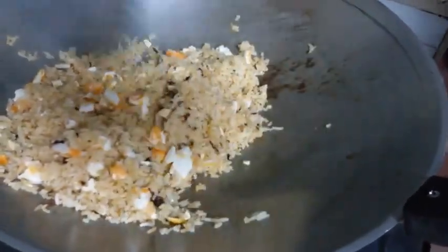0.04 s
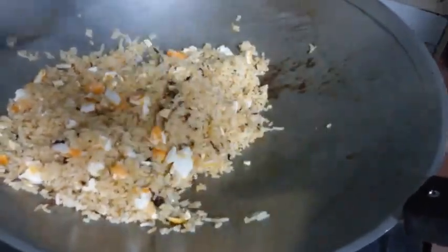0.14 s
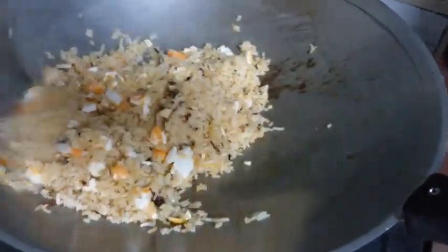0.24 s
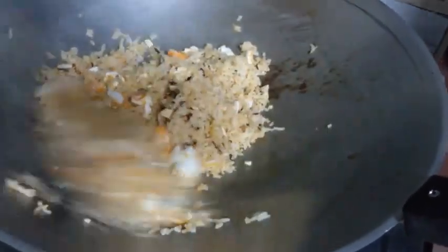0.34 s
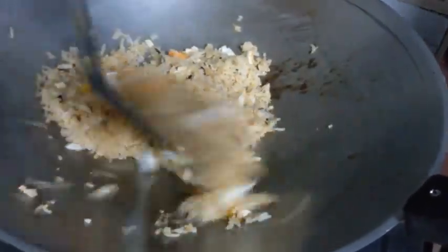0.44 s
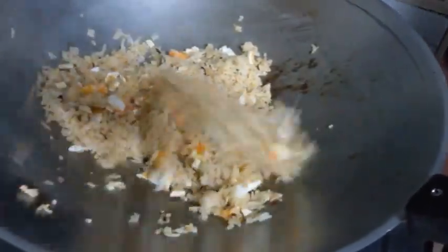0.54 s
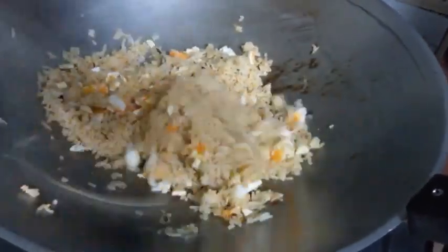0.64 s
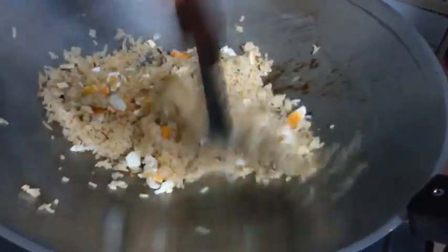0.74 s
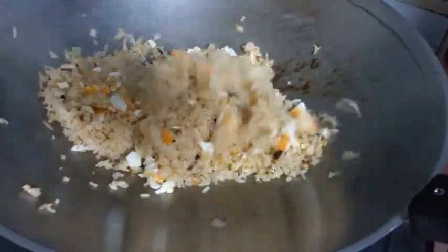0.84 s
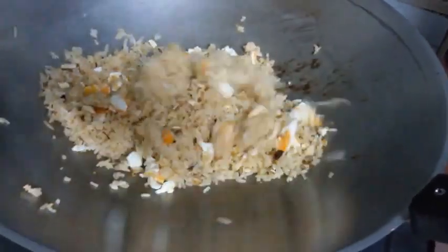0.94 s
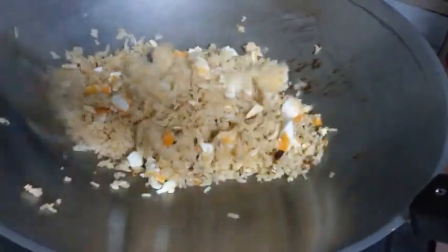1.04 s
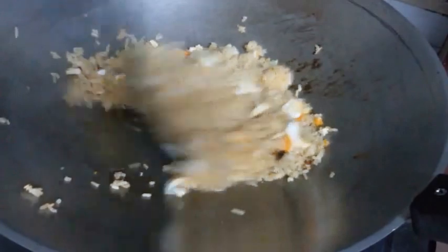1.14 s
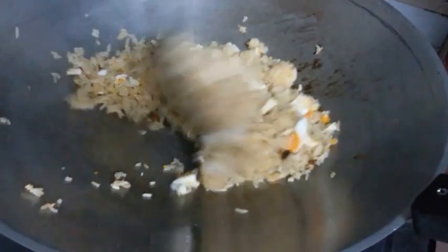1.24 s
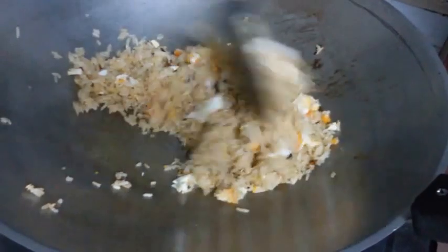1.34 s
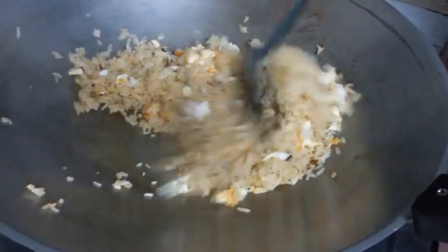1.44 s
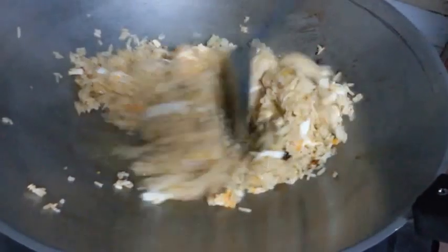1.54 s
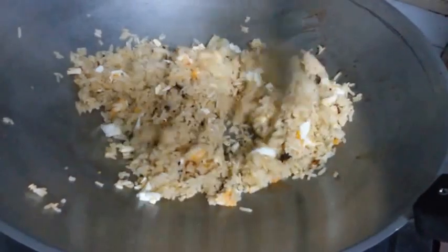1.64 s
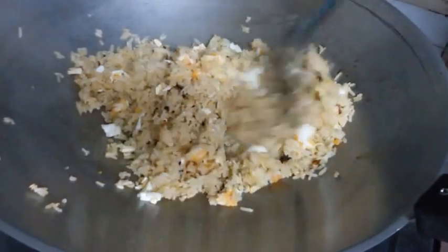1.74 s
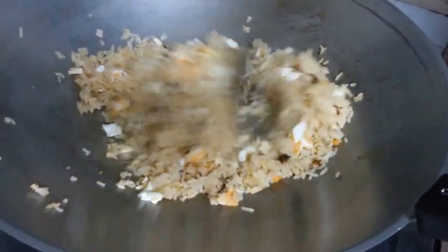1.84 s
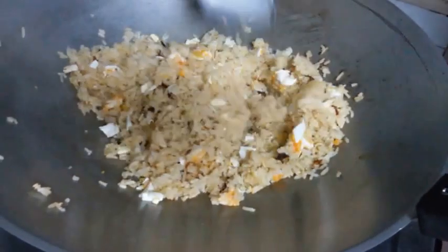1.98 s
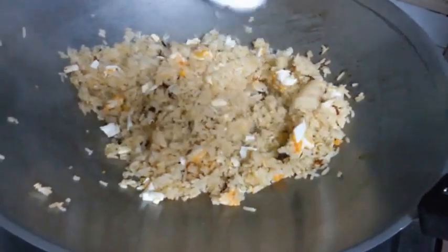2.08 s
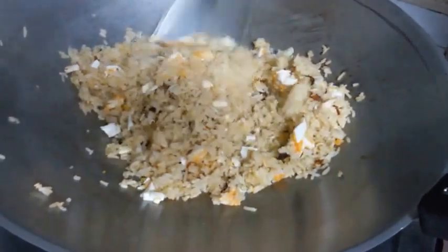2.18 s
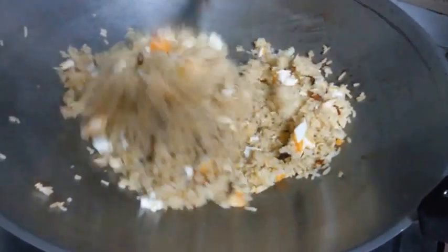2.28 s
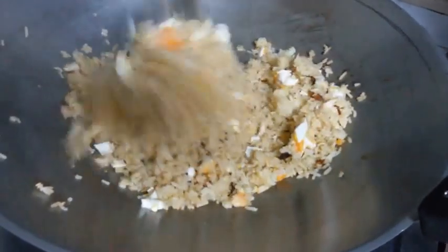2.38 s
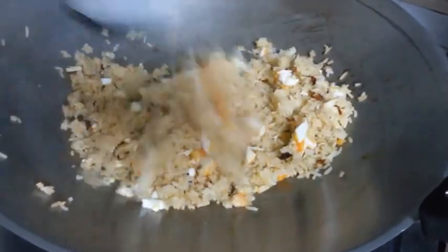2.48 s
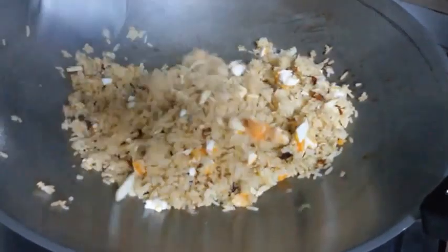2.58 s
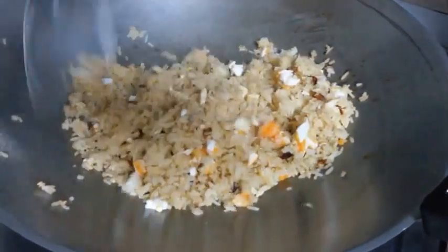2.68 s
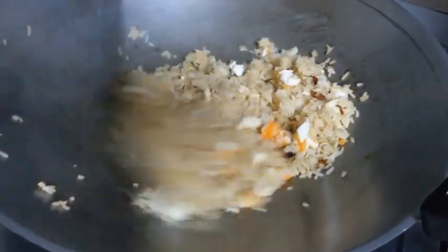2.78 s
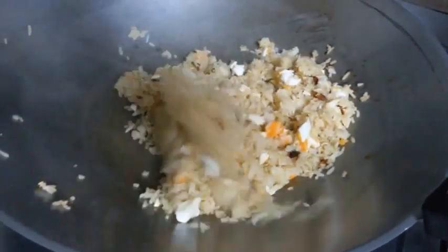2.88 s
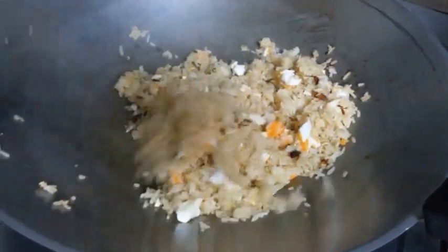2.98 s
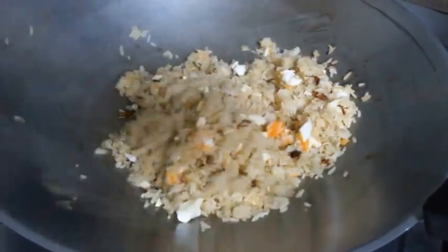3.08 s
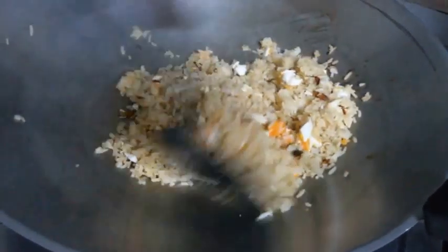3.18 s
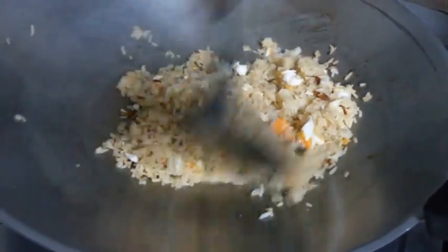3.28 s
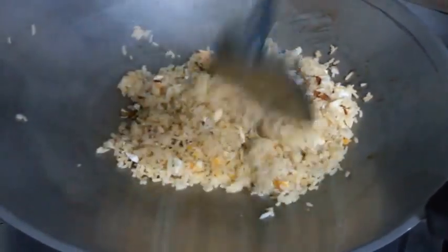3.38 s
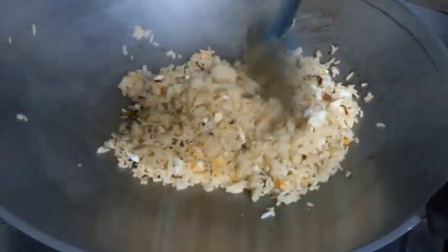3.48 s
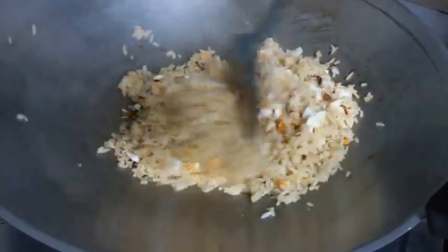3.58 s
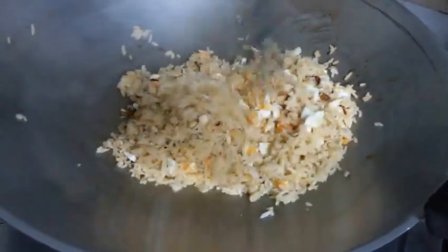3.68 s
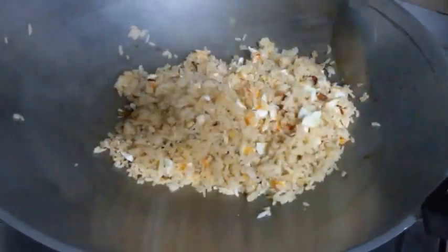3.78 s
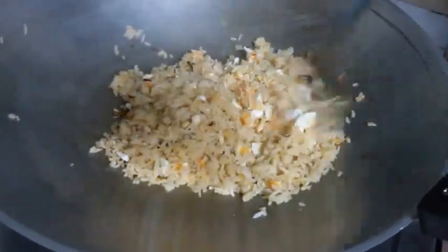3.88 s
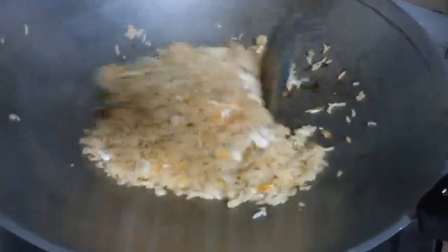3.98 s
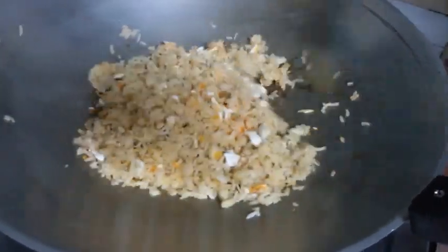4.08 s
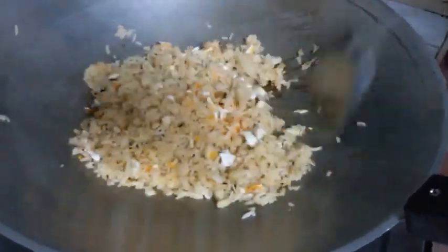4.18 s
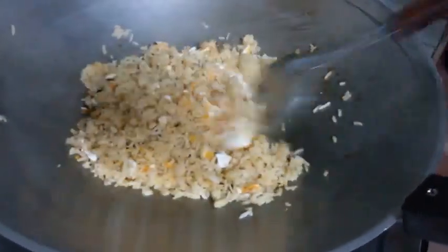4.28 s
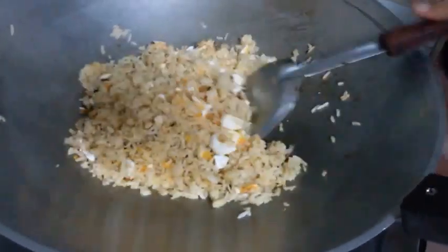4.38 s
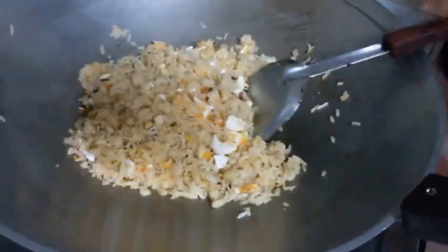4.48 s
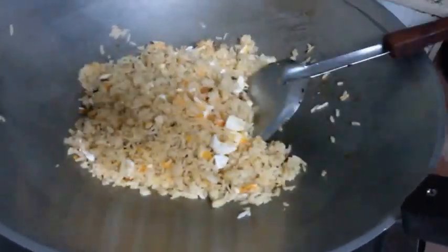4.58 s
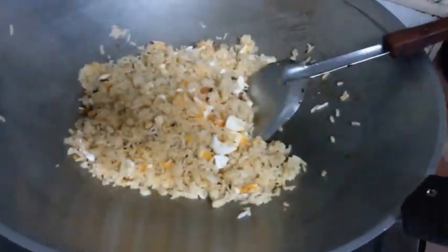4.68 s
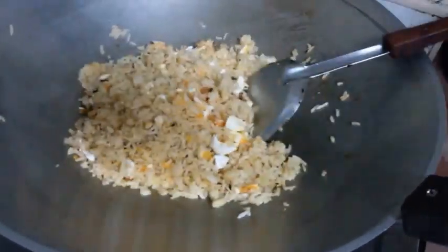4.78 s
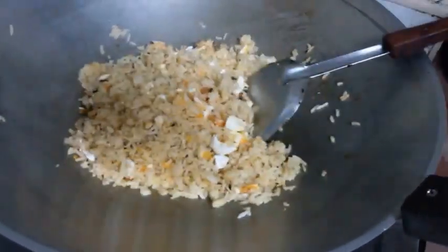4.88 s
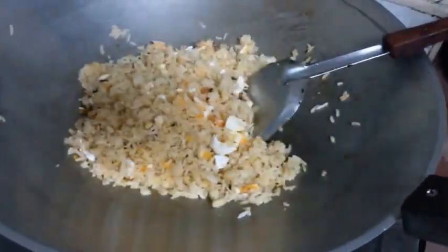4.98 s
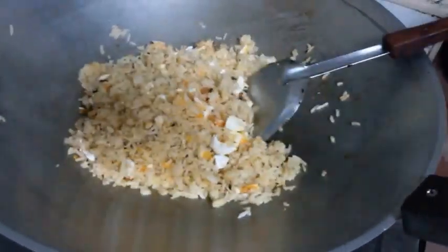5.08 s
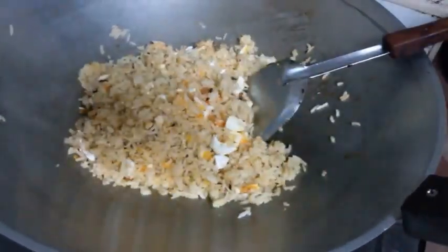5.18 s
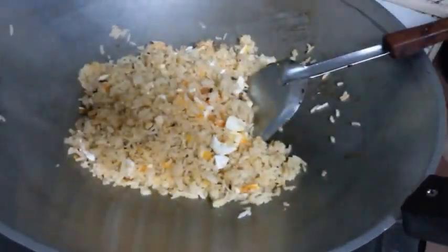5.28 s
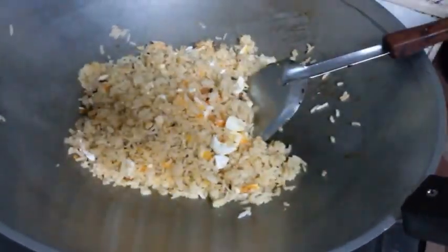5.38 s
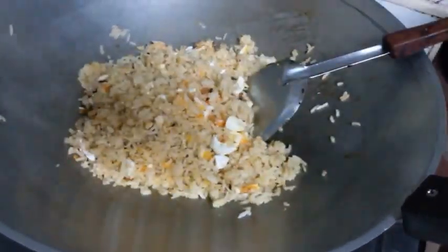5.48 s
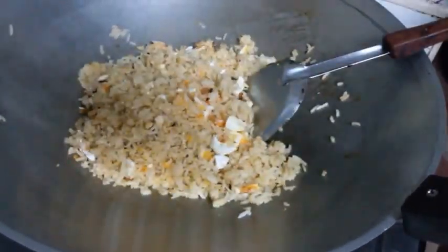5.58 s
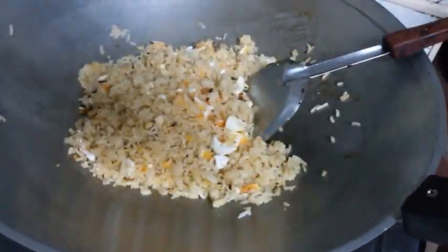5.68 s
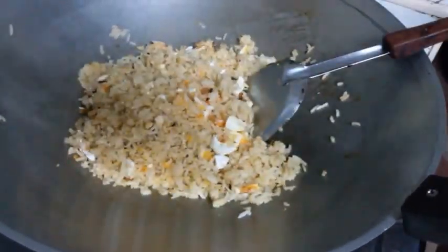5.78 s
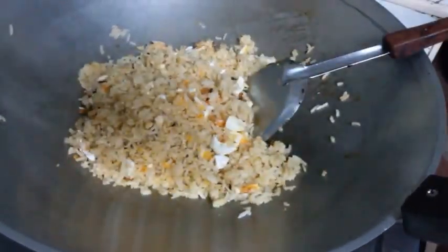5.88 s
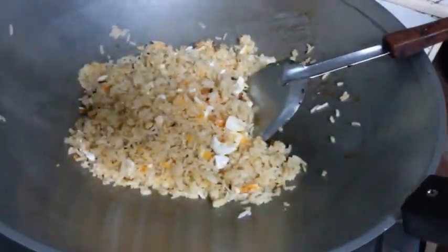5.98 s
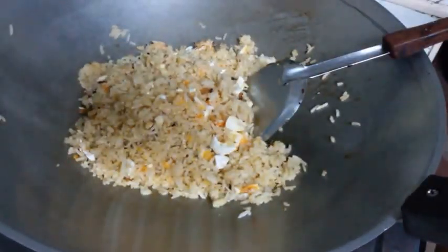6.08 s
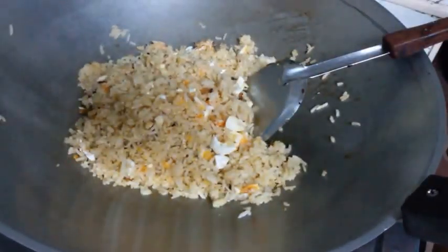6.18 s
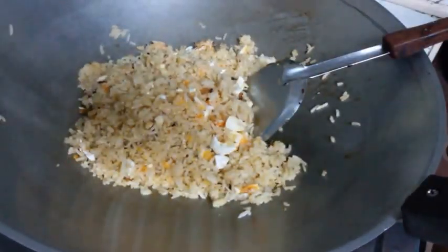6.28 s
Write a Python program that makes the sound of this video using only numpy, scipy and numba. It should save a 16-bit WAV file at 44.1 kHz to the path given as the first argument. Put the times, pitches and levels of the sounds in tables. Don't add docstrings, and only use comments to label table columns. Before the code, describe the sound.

Sharp, short steel clanks and gritty scrapes of stir-frying rice over faint hiss; after the last knock, frying sizzle rises and crackles on.

```python
import sys
import numpy as np
from scipy import signal
from scipy.fft import rfft, irfft
from scipy.io import wavfile
from scipy.ndimage import uniform_filter1d
from numba import njit

SR = 44100
rng = np.random.default_rng(int(sys.argv[2]) if len(sys.argv) > 2 else 0)


def output_pcm(signal):
    pcm = np.clip(np.atleast_2d(signal).T, -1, 1) * 32767
    wavfile.write(sys.argv[1], SR, np.round(pcm).astype(np.int16))


def makeup_ratio(level_db):
    decades = np.asarray(level_db, float) / 20
    return 10 ** decades


N = 279153

# [t/s, peak level/dB, thud 150-600 Hz level/dB, body 0.7-2.4 kHz level/dB, body note f/Hz]
BLOWS = [(0.2385, 0, -39, -18, 1280), (0.6637, 2, -31, -20, 1470), (1.064, 4, -26, -17, 1480),
         (1.5516, 5, -23, -7.5, 2080), (1.8632, 4.5, -18, -10.5, 1900), (2.1616, -1, -25, -19.5, 1380),
         (2.2164, -1, -41, -26, 1330), (2.6646, 3, -46, -13, 858), (3.1271, -2.5, -29, -14, 870),
         (3.9394, 0, -21, -17.5, 1330), (4.2697, 0.5, -21, -19.5, 1980), (4.2914, -9, -30, -22, 1990),
         (4.5615, -2, -18, -3.5, 922)]
SPLIT_HZ = 2500


def level(x, db):
    return x * makeup_ratio(db) / np.sqrt(np.mean(x ** 2))


def on_log(table, hz):
    points = np.array(table, float)
    return np.interp(np.log(hz), np.log(points[:, 0]), points[:, 1])


def band(x, lo_hz, hi_hz):
    sos = signal.butter(2, [lo_hz, min(hi_hz, .45 * SR)], "band", fs=SR, output="sos")
    return signal.sosfilt(sos, x)


def colour(x, table):
    hz = np.maximum(np.arange(N // 2 + 1) * SR / N, 1.)
    return level(irfft(rfft(x) * makeup_ratio(on_log(table, hz)), N), 0)


def walk(rate, count=1):
    hold = int(SR / rate)
    held = np.repeat(rng.standard_normal((count, N // hold + 1)), hold, axis=1)
    return 0.77 * uniform_filter1d(held, hold, axis=1)[:, :N]


def fan(flicker_db):
    # [f/Hz, level/dB per Hz]
    air_colour = [(15, -52), (25, -20), (65, -8), (95, -16), (126, -4.5), (184, -5.5), (243, -4.5),
                  (275, -3.5), (387, -11.5), (849, -13.5), (1070, -13.5), (1710, -15.5), (4000, -20.5),
                  (5200, -24), (8800, -120)]
    air = rfft(colour(rng.standard_normal(N), air_colour))
    octave = np.log2(np.maximum(np.arange(len(air)) * SR / N, 1.) / 20)
    flickering = np.zeros(N)
    for k, flicker in enumerate(walk(8, count=10)):
        share = np.clip(1 - np.abs(octave - k), 0, 1)
        flickering += irfft(air * share, N) * makeup_ratio(flicker_db * flicker)
    hum_hz, hum_width_hz, hum_db = 100.9, 9.5, -8.5
    hum = band(rng.standard_normal(N), hum_hz - hum_width_hz / 2, hum_hz + hum_width_hz / 2)
    return level(flickering, 0) + level(hum, hum_db)


def sizzle(top_db, grain_db, grains_per_s, crackle_db):
    # [f/Hz, level/dB per Hz]
    fry_colour = [(880, -32), (1500, -9.5), (3370, -3.5), (3670, -1.5), (4050, 0), (5720, 5.5), (9180, -5),
                  (14000, -14), (15000, -18.5)]
    size = np.minimum(rng.exponential(size=N), 4)
    grains = (rng.random(N) < grains_per_s / SR) * makeup_ratio(grain_db * size)
    puffs = signal.lfilter([1], [1, -.95], grains) * rng.standard_normal(N)
    hiss = rng.standard_normal(N) * makeup_ratio(3.1 * walk(14)[0])
    fizz = colour(level(hiss, 0) + level(puffs, crackle_db), fry_colour)
    return fizz + (makeup_ratio(top_db) - 1) * band(fizz, 10600, 22300)


def frying():
    # [t/s, level/dB]
    heat = [(0.0, -36.5), (0.2, -42), (0.45, -37), (1.0, -37), (1.3, -34), (1.55, -36.5), (2.1, -37.5),
            (2.5, -40), (3.0, -39), (3.45, -39), (3.85, -38), (4.2, -41), (4.7, -42.5), (5.3, -42),
            (5.8, -43.5), (6.33, -42)]
    return makeup_ratio(np.interp(np.arange(N) / SR, *np.transpose(heat)))


def spits(cycles, top_s):
    # [t/s, peak level/dB, centre f/Hz]
    droplets = [(0.031, -15.5, 5460), (0.089, -16, 6000), (0.104, -15, 5940), (0.1623, -6.5, 5970),
                (0.2024, -25, 3040), (0.2174, -22, 4500), (0.4773, -14.5, 4980), (0.5078, -11, 4970),
                (0.5172, -12, 5900), (0.596, -19.5, 5700), (0.8922, -15.5, 4650), (0.9248, -17.5, 5850),
                (1.3028, -18, 6440), (1.3554, -19, 4660), (1.4484, -17, 5700), (2.1041, -15, 5840),
                (2.4628, -29, 4930), (3.4028, -16, 5900), (5.257, -19, 5840), (5.426, -15, 4250),
                (5.6284, -18.5, 5940), (5.7567, -31, 5680), (5.7851, -18, 5200), (5.8135, -28, 5900),
                (5.8227, -21, 5900), (5.9987, -23, 3660), (6.1226, -20, 4900), (6.2551, -21.5, 4570),
                (6.264, -27, 4970), (6.2946, -19, 5270)]
    out, t = np.zeros(N + 400), np.arange(400) / SR
    noises = rng.standard_normal((len(droplets), 2, 400))
    for (s, peak_db, hz), noise in zip(droplets, noises):
        pop = band(noise[0] * np.exp(-t * hz / cycles), 0.5 * hz, 1.47 * hz)
        top_db = -14 - 6 * noise[1, -1]
        crack = band(noise[1] * np.exp(-t / top_s), 5400, 11700)
        burst = pop / np.abs(pop).max() + makeup_ratio(top_db) * crack / np.abs(crack).max()
        start = int(s * SR)
        out[start:start + 400] += makeup_ratio(peak_db) * burst
    return out[:N]


def pan_modes(count, strong_db):
    # [f/Hz, level/dB]
    strongest = [(258.4, -45), (872.1, -43), (979.8, -44), (2191, -47), (2772, -42), (3208, -41),
                 (3661, -43), (3747, -42), (4339, -42), (4495, -38), (4657, -41), (5292, -42), (5572, -43),
                 (5809, -40), (6352, -40), (6503, -41)]
    # [f/Hz, level/dB]
    thicket = [(1410, -42), (2400, -9), (2760, -6), (3060, -10.5), (4110, -0.5), (4490, 0), (5530, -1),
               (6080, 2.5), (7700, -13), (14000, -42.5)]
    # [f/Hz, T60/s]
    decay = [(200, .2), (900, .18), (1300, .14), (2900, .12), (4000, .07), (13000, .04)]
    strong_hz = np.transpose(strongest)[0]
    dense_hz = np.concatenate((np.geomspace(215, 2380, count // 3), np.linspace(2550, 14000, count)))
    dense_hz = dense_hz * (1 + 0.0076 * rng.standard_normal(len(dense_hz)))
    hz = np.concatenate((strong_hz, dense_hz))
    lift_db = np.concatenate((np.full(len(strong_hz), strong_db), np.zeros(len(dense_hz))))
    db = lift_db + on_log(thicket, np.maximum(hz, 2700))
    t60 = on_log(decay, hz) * np.exp(.2 * rng.standard_normal(len(hz)))
    return hz, db, t60


@njit
def ring(force, hz, t60, coupling):
    out = np.zeros(len(force))
    for m in range(len(hz)):
        p = np.exp(2j * np.pi * hz[m] / SR - np.log(1000) / (t60[m] * SR))
        z = 1e-18 + 0j
        for i in range(len(force)):
            z = z * p + force[i] * coupling[m, i >> 6] + 1e-18
            out[i] += z.imag
    return out


def radiate(force, hz, t60, mix):
    low = hz < SPLIT_HZ
    bright = ring(force, hz[~low], t60[~low], mix[~low])
    bright = signal.sosfilt(signal.butter(8, SPLIT_HZ, "high", fs=SR, output="sos"), bright)
    sign = np.where(hz[low] < 1100, (-1.) ** np.arange(low.sum()), 1)
    body = band(ring(force, hz[low], t60[low], mix[low] * sign[:, None]), 223, 6800)
    return bright + body, np.abs(bright)


def blows(modes, chatter_s, note_db):
    hz, db, t60 = modes
    out, length = np.zeros(N + SR), SR // 3
    t = np.arange(length) / SR
    edge_db = -17.5
    for s, peak_db, thud_db, body_db, note_hz in BLOWS:
        tilt = [(300, thud_db + 23.5), (450, thud_db + 13), (720, thud_db + 9.5),
                (800, body_db + 6), (1400, body_db + 11.5), (2300, body_db + 10),
                (2520, 0.04), (6800, 0.045), (8000, edge_db + 12.5)]
        note = np.exp(-(np.log(hz / note_hz) / .05) ** 2) * min(1100 / note_hz, 1) ** 1.5
        spot_db = 1.5 * rng.standard_normal(len(hz)) * (1 - note)
        mix = makeup_ratio(db + on_log(tilt, hz) + note_db * note + spot_db)
        mix = np.repeat(mix[:, None], length // 64 + 1, axis=1)
        roam = np.repeat(rng.standard_normal((len(hz), 30)), 8, axis=1)[:, :mix.shape[1]]
        roam_db = 3 * roam + 7 * uniform_filter1d(roam, 7, axis=0)
        mix = mix * makeup_ratio(roam_db * (1 - note)[:, None])
        shake = np.exp(-t / chatter_s) + makeup_ratio(-13.5) * np.exp(-t / 0.043)
        force = rng.standard_normal(length) * shake * np.clip(t / 0.0017, 0, 1)
        clang, size = radiate(force, hz, t60 * (0.54 + 0.64 * note), mix)
        start = int(s * SR)
        out[start:start + length] += clang * makeup_ratio(peak_db) / size.max()
    return out[:N]


def strokes(modes, slip_db, focus_db, judder_db):
    # [lift t/s, pressure at the lift level/dB, fade/dB per s, body 0.7-2.4 kHz level/dB, brightest ringing f/Hz]
    scrapes = [
        (0.413, -21, 450, -19.5, 5250),
        (0.786, -20.5, 902, -20.5, 4370),
        (1.202, -16, 903, -15, 4700),
        (2.278, -15.5, 257, -16.5, 4820),
        (2.766, -15.5, 210, -18.5, 5250),
        (3.26, -16, 412, -21, 6350),
        (3.989, -17, 445, -13, 5500),
        (4.348, -17, 242, -12.5, 5750),
    ]
    swell_db_per_s, touch_s, fade_out_db = 56, 0.022, 40
    lift_body_db, lift_s, dulling_per_s = 6.5, .04, 1.2
    hz, db, t60 = modes
    out = np.zeros(N + SR)
    for lift_at_s, press_db, fade_db_s, rasp_body_db, bright_hz in scrapes:
        touch_at_s = max(blow[0] for blow in BLOWS if blow[0] < lift_at_s)
        t = touch_at_s + np.arange(SR // 2) / SR
        t = t[t < lift_at_s + fade_out_db / fade_db_s + .12]
        count = len(t)
        lifted = t - lift_at_s
        swell_db = np.minimum(swell_db_per_s * lifted, -fade_db_s * lifted)
        press = np.clip((t - t[0]) / touch_s, 0, 1) * makeup_ratio(press_db + swell_db)
        press = press * makeup_ratio(judder_db * walk(53.7)[0, :count])
        uneven_db = slip_db * rng.exponential(size=count) + 1.5 * walk(160)[0, :count]
        slips = rng.standard_normal(count) * makeup_ratio(uneven_db)
        steps = lifted[::64]
        spots = np.repeat(rng.standard_normal((len(hz), 24)), 16, axis=1)
        spots = uniform_filter1d(spots, 12, axis=1)[:, :len(steps)]
        wander_db = 5.5 * spots + 18 * uniform_filter1d(spots, 9, axis=0)
        detune = np.log(hz[:, None] / bright_hz) + dulling_per_s * np.maximum(steps, 0)
        focus = np.exp(-(detune / 0.097) ** 2)
        body_db = rasp_body_db + lift_body_db * min(fade_db_s / 900, 1) * np.clip(1 + steps / lift_s, 0, 1)
        body_tilt_db = on_log([(300, 8), (420, 2.5), (720, -1), (830, 0.5), (2000, 13.5)], hz)[:, None]
        low_db = (hz[:, None] < SPLIT_HZ) * (body_db + body_tilt_db)
        grit_db = on_log([(6500, 0.5), (8000, 6.5), (12000, 10)], hz)[:, None]
        mix = makeup_ratio(db[:, None] + wander_db + focus_db * focus + low_db + grit_db)
        mix = mix / np.sqrt(np.sum(mix ** 2 * t60[:, None], axis=0))
        rasp, size = radiate(slips * press, hz, .55 * t60, mix)
        start = int(t[0] * SR)
        out[start:start + count] += rasp * np.sqrt(np.sum(press ** 2) / np.sum(size ** 2))
    return out[:N]


def kitchen(x):
    t60_s, tail_db = 0.23, -11
    t = np.arange(SR // 2) / SR
    tail = rng.standard_normal(len(t)) * np.exp(-np.log(1000) * t / t60_s) * np.clip(t / 0.0012, 0, 1)
    tail = band(tail, 168, 7340)
    return signal.fftconvolve(x, tail * makeup_ratio(tail_db) / np.sqrt(np.sum(tail ** 2)))[:N]


def gain_control():
    wait_s, rise_s, open_db = 0.71, 0.22, 15.5
    dropout_s, dropout_length_s, dropout_db = 1.8585, .004, -30
    t = np.arange(N) / SR
    quiet = np.maximum(t - BLOWS[-1][0] - wait_s, 0) / rise_s
    opening = 1 - np.exp(-quiet ** 1.48 / 1.45)
    dropout = np.clip(1 - ((t - dropout_s) / dropout_length_s) ** 2, 0, 1)
    return makeup_ratio(open_db * opening + dropout_db * dropout)


def drop_weak_bands(x, under_db, loud_share, scatter_db):
    hz, _, frames = signal.stft(x, SR, nperseg=2048)
    edges = np.append(np.geomspace(16, 200, 22), np.arange(200, 740, 20))
    edges = np.unique(np.round(edges).astype(int))
    widths = np.diff(np.append(edges, len(hz)))
    power = np.add.reduceat(np.abs(frames) ** 2, edges, axis=0) / widths[:, None]
    band_db = 10 * np.log10(power + 1e-14)
    top_db = band_db.max(axis=0)
    limit_db = on_log(under_db, hz[edges])[:, None] + top_db + loud_share * (top_db - np.median(top_db))
    scatter = np.repeat(rng.standard_normal(band_db.shape), 3, axis=1)[:, :len(top_db)]
    short_db = limit_db - band_db + scatter_db * scatter
    attack = top_db - np.roll(top_db, 1) > 9
    keep = makeup_ratio(-35 * np.clip(short_db, 0, 1) * ~attack)
    frames[edges[0]:] *= np.repeat(keep, widths, axis=0)
    return signal.istft(frames, SR, nperseg=2048)[1][:N]


def stereo_parting(mid):
    # [t/s, length/s, difference under the sound level/dB]
    moments = [
        (0.317, 0.033, -27),
        (1.55, 0.064, -10),
        (2.165, 0.047, -14),
        (2.369, 0.028, -14),
        (2.502, 0.056, -12),
        (2.661, 0.038, -9.5),
        (3.338, 0.038, -15),
        (4.544, 0.066, -15),
    ]
    t = np.arange(N) / SR
    apart = np.zeros(N)
    for s, length_s, db in moments:
        apart += makeup_ratio(db) * np.sin(np.pi * np.clip((t - s) / length_s, 0, 1))
    return apart * walk(550)[0] * mid


def scene():
    bed = makeup_ratio(-41.5) * fan(flicker_db=2.47)
    bed = bed + frying() * sizzle(top_db=4.5, grain_db=5.0, grains_per_s=480, crackle_db=-1.5)
    oil = spits(cycles=1.9, top_s=0.00068)
    modes = pan_modes(count=200, strong_db=3.5)
    steel = blows(modes, chatter_s=0.0037, note_db=14)
    steel = steel + strokes(modes, slip_db=2.0, focus_db=4.0, judder_db=3.5)
    return np.tile(steel + oil + kitchen(steel) + bed, (2, 1))


def top_cut(x):
    return signal.sosfilt(signal.butter(12, 15760, fs=SR, output="sos"), x)


def record(dry):
    top_hz, clip = 14700, .93
    clipped = np.clip(dry[0] * gain_control(), -clip, clip)
    cut = signal.sosfilt(signal.ellip(8, .2, 30, top_hz, fs=SR, output="sos"), clipped)
    cut = signal.sosfilt(signal.butter(2, 45, "high", fs=SR, output="sos"), cut)
    # [f/Hz, gate under the strongest band level/dB]
    under_db = [(400, -23.5), (800, -27.5), (2000, -33.5), (9000, -27.5), (11000, -28.0), (14000, -24)]
    mid = drop_weak_bands(cut, under_db, loud_share=0.288, scatter_db=4.5)
    side = stereo_parting(mid)
    return top_cut(np.array([mid + side, mid - side]))


dry = scene()
out = record(dry)
output_pcm(out)
```